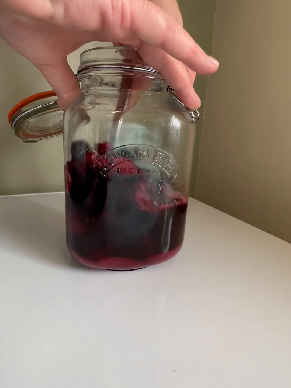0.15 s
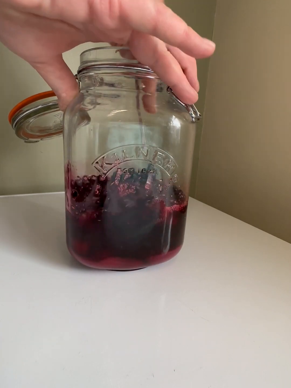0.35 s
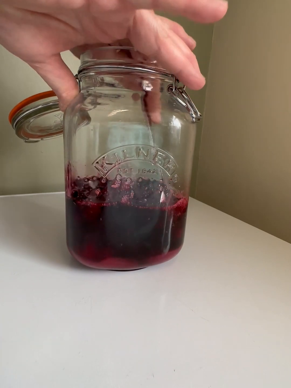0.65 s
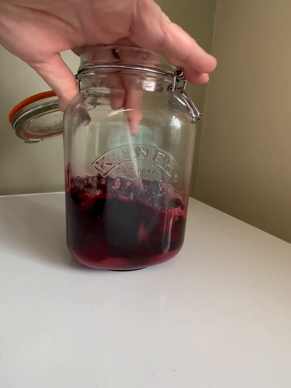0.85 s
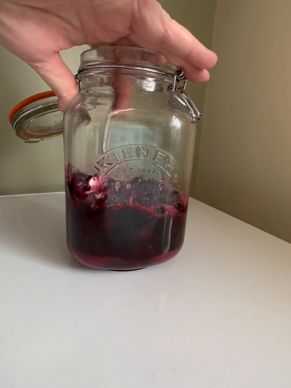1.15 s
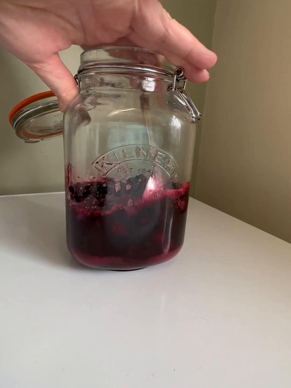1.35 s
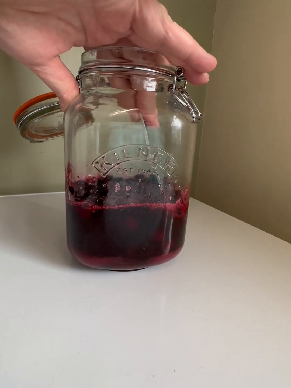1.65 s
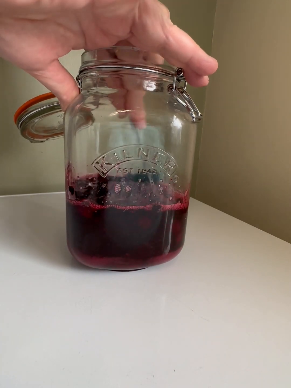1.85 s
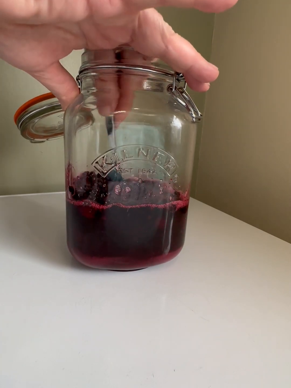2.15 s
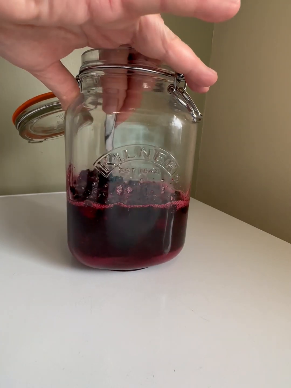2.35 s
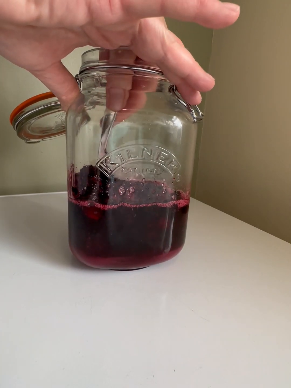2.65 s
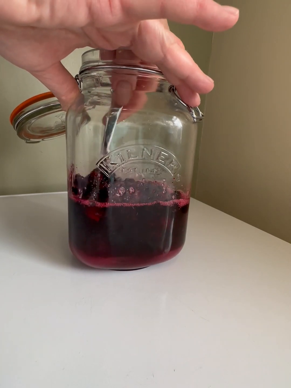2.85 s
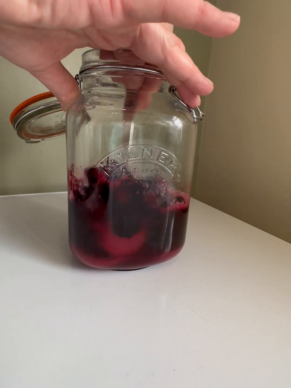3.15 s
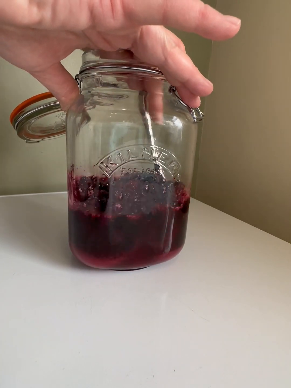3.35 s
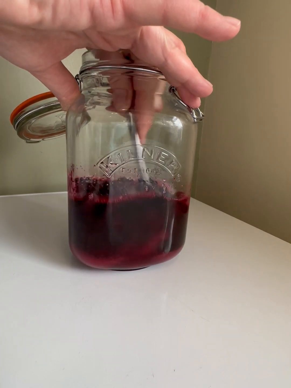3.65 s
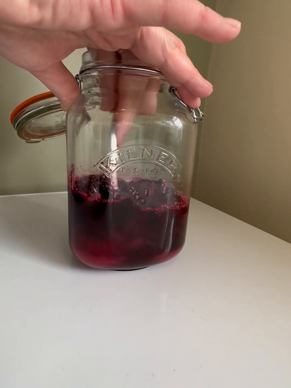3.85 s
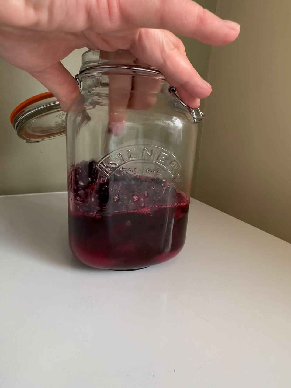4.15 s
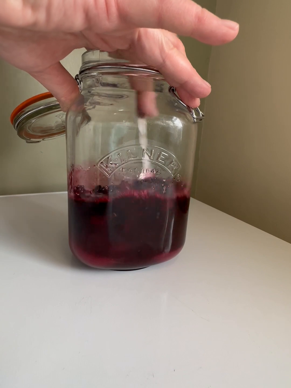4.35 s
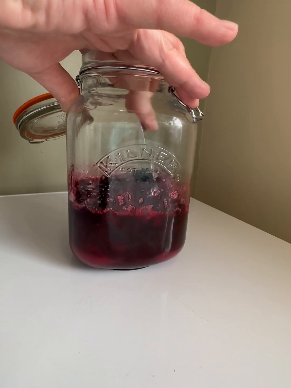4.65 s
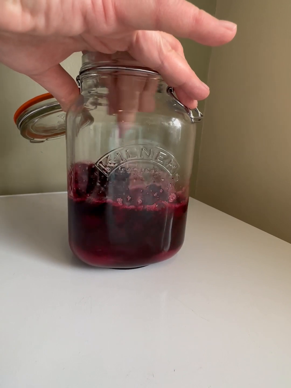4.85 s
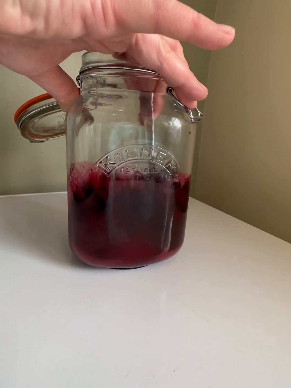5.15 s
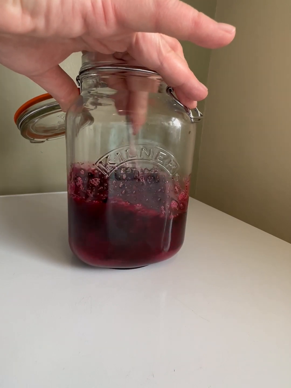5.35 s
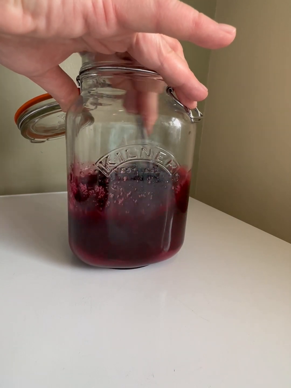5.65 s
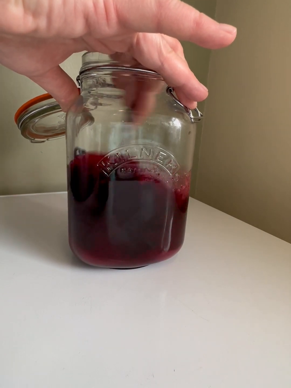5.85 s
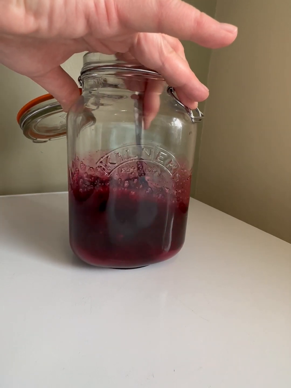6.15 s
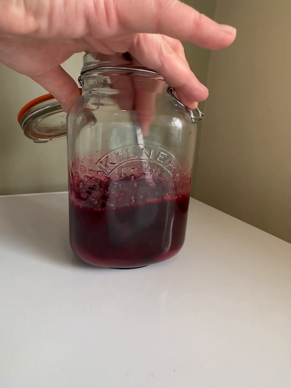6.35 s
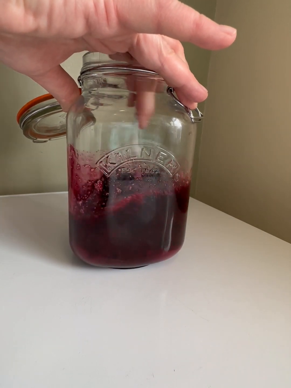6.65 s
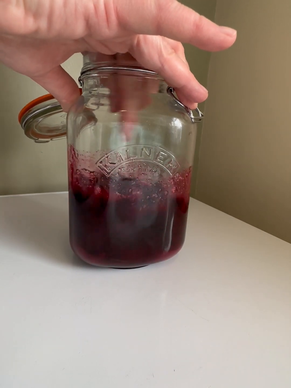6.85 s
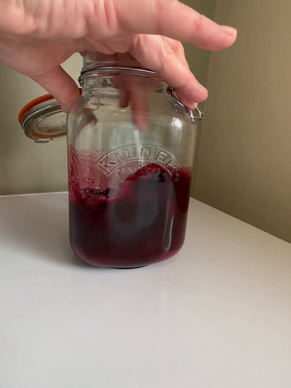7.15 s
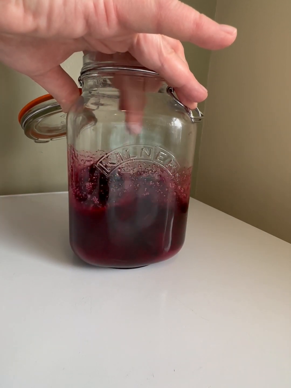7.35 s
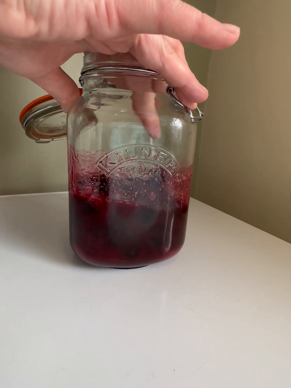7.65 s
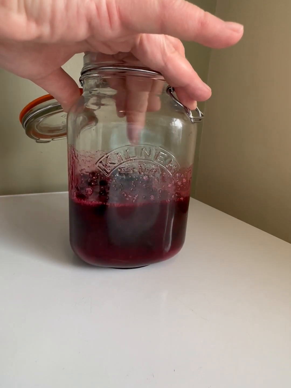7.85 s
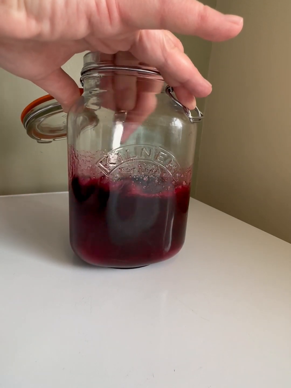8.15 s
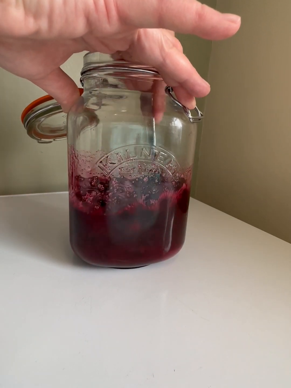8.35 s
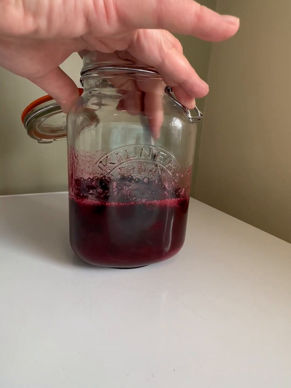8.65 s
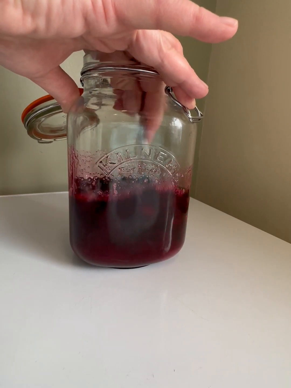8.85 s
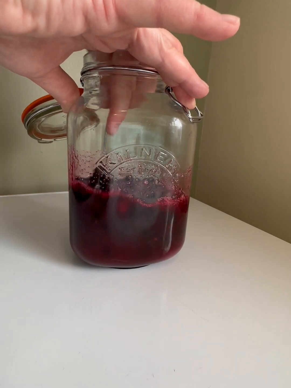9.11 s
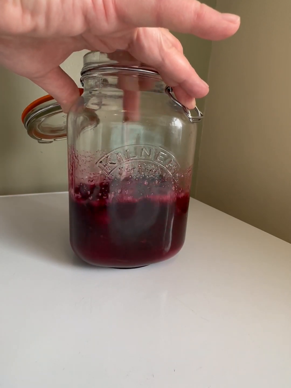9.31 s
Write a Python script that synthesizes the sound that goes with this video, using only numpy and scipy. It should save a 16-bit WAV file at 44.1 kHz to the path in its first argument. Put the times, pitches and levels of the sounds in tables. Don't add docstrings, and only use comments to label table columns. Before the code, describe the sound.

Close-up stirring of juicy fruit and sugar in a glass jar: short choked knocks, light ticks, soft grinding and booming bumps, growing busier.

```python
import sys
import numpy as np
from scipy import signal
from scipy.fft import rfft, irfft, next_fast_len
from scipy.io import wavfile
from scipy.ndimage import uniform_filter1d, map_coordinates

SR = 44100
rng = np.random.default_rng(int(sys.argv[2]) if len(sys.argv) > 2 else 0)


def to_linear_factor(level_db):
    exponent = np.asarray(level_db, float) / 20
    return 10 ** exponent


def pcm_store(signal):
    levels = np.round(np.clip(np.atleast_2d(signal), -1, 1) * 32767)
    wavfile.write(sys.argv[1], SR, levels.astype(np.int16).T)


N = 418068

# start in seconds, peak level in dB,
# strongest wall mode in Hz, middle modes in dB, high modes in dB.
KNOCKS = [(0.782, -20, 1420, -14, -22.5), (0.833, -19, 1174, -7.5, -24.5), (1.949, -17, 1705, -5.5, -22),
          (3.684, -27.5, 1110, -9, -24), (3.718, -21.5, 1116, -13, -25.5), (4.746, -28, 1106, -17, -9.5),
          (4.934, -21.5, 1570, -10, -4), (4.99, -14, 1203, 2.5, -7.5), (5.361, -23.5, 1650, -22, -26.5),
          (5.436, -19.5, 1175, -19.5, -14), (5.932, -16, 1453, -8, -14), (6.258, -15, 2685, -14, -17),
          (6.363, -18, 1370, -4, -16), (6.421, -12.5, 1224, -23, -28.5), (6.813, -17, 2750, -22.5, -24.5),
          (7.364, -5, 1156, -22.5, -21.5), (7.627, -17.5, 1785, -0.5, -3.5),
          (7.845, -8, 1020, -17.5, -30.5), (7.901, -14.5, 1680, -16, -19.5), (8.059, -16.5, 970, -5, 2),
          (8.87, -15, 1410, -11, -11), (8.922, -18.5, 1225, -28, -25), (8.942, -21, 1180, -15.5, -41),
          (9.085, -29, 950, -23, -25.5)]
# start in seconds, peak level in dB,
# strongest wall mode in Hz, brightness in dB.
TAPS = [(0.034, -53, 3160, -16), (0.822, -37, 1490, -7.5), (0.885, -33, 1170, -24),
        (1.269, -45.5, 1740, -2), (1.998, -33.5, 1580, -19), (2.662, -39, 1100, 6),
        (2.761, -30, 1600, -4.5), (2.818, -32, 1050, -9), (2.981, -34.5, 1450, -6), (3.016, -35, 1930, -13),
        (3.237, -37.5, 1080, -13.5), (3.493, -30, 1420, -13), (3.834, -36, 1170, -39),
        (4.881, -31.5, 1510, -5), (4.982, -25, 1600, -5.5), (5.424, -48, 4000, -5),
        (5.654, -35.5, 1540, -11.5), (5.709, -25.5, 1600, -8), (5.831, -29, 1230, -31),
        (5.874, -33, 1940, -23), (6.776, -35.5, 1600, -11.5), (6.901, -38.5, 900, -13),
        (7.021, -38.5, 1800, -28), (7.4235, -27, 1500, -28.5), (7.644, -23, 1680, -7.5),
        (7.724, -38, 940, -18), (8.151, -26.5, 1240, -14), (8.519, -25.5, 1250, -25),
        (9.067, -29.5, 1620, -13), (9.14, -31.5, 3860, -12.5)]
# start in seconds, peak level in dB,
# strongest wall mode in Hz, brightness in dB.
TICKS = [(0.903, -38, 3200, -23), (1.072, -32, 1600, -10.5), (1.585, -33.5, 3120, -2),
         (1.643, -35.5, 2970, -24), (1.691, -28, 3290, -19), (2.498, -40.5, 2970, -10),
         (2.516, -38, 2360, -5.5), (2.53, -24, 2680, 20), (2.696, -40.5, 3230, -6), (4.134, -40, 1800, -23),
         (4.356, -32, 3270, -2), (4.628, -42.5, 1980, -16.5), (5.104, -33.5, 3290, -14),
         (5.144, -34, 3230, -10), (5.913, -34.5, 3330, -16.5), (6.463, -28, 3650, -14),
         (6.499, -26, 2750, -13.5), (6.523, -37, 1390, -22.5), (6.944, -38, 3530, -19.5),
         (7.521, -32.5, 2430, -2), (8.018, -38.5, 4500, -19), (8.031, -28, 3000, -19),
         (8.089, -45, 3070, -8), (8.393, -25.5, 2470, -6), (8.468, -25.5, 3080, -13),
         (8.647, -29.5, 2290, -22), (8.673, -36.5, 1800, -4), (8.889, -31, 3000, -17),
         (9.022, -27, 2060, -19.5), (9.398, -46, 2410, -29)]
# start in seconds, peak level in dB,
# strongest wall mode in Hz.
SNAPS = [(4.664, -44.5, 1500), (0.245, -52.5, 4800), (0.734, -53, 990), (0.998, -55, 4400),
         (1.251, -48, 1470), (1.634, -33, 3100), (2.242, -35.5, 1680), (2.475, -49, 2890),
         (2.671, -60, 3030), (2.828, -43, 3080), (4.817, -36, 1560), (4.834, -37, 1530),
         (5.166, -33.5, 3100), (5.529, -39.5, 2670), (5.694, -34, 1080), (7.254, -43.5, 3630),
         (7.433, -31, 4090), (7.472, -41.5, 1700), (7.961, -37, 2400), (8.132, -33.5, 2920),
         (8.959, -44, 1930), (8.983, -46, 3640), (2.568, -40, 3040), (4.853, -36, 1500),
         (6.645, -45.5, 3020), (6.664, -41, 3550), (6.703, -47.5, 2630), (6.75, -50, 1800),
         (6.996, -43, 2190), (7.088, -53.5, 2310), (7.994, -34.5, 1500), (8.068, -29.5, 1250),
         (8.805, -48, 2510), (8.856, -39, 1270), (8.999, -37, 3830), (5.003, -28, 1090), (8.461, -37, 1650),
         (8.481, -28, 1690), (8.501, -37.5, 1700), (8.53, -36.5, 1710), (8.566, -45, 1650),
         (8.919, -34.5, 2840), (8.938, -31, 1430), (8.961, -37.5, 2500), (5.38, -43, 1600),
         (5.479, -41, 3070), (5.497, -42, 2100), (5.557, -38.5, 3100), (5.725, -31, 1550),
         (5.886, -44, 1790), (3.358, -51, 2970), (3.404, -68, 2270), (3.665, -43.5, 2580),
         (7.442, -36, 2630), (7.833, -31, 2760), (7.894, -39, 5600), (6.478, -31, 3350), (0.76, -62, 2400)]
# start in seconds, peak level in
# dB, mode in Hz.
SECOND_MODES = [(0.782, -19, 880), (0.782, -24.5, 2500), (0.832, -21, 1500), (1.071, -32.5, 2500),
                (1.95, -19, 2990), (1.95, -21, 950), (4.748, -33, 2200), (4.937, -34, 5900),
                (4.992, -32, 3100), (4.991, -18.5, 1600), (5.438, -23, 1720), (6.259, -20, 1200),
                (6.42, -30, 1610), (7.3647, -9.5, 1562), (7.364, -25.5, 6080), (7.631, -39, 4080),
                (7.845, -16, 1750), (7.901, -21, 2360), (7.902, -12, 1110), (8.017, -31.5, 4130),
                (8.058, -25.5, 5780), (8.154, -25.5, 2100), (8.87, -14.5, 2680), (8.393, -26.5, 3210)]
# centre in Hz, width in Hz, level in dB.
GLASS_MODES = [(940, 125, 4), (1600, 270, 7), (2600, 58, 0.5), (3100, 420, 2), (3890, 180, -1),
               (6310, 260, 0), (8750, 980, 5), (9550, 670, -4)]
# mode in Hz, level in dB, t60 in seconds.
SPOON_MODES = [(6240, -40, 0.15), (8600, -34, 0.1), (9890, -38, 0.2), (11300, -47, 0.14),
               (12300, -47, 0.25)]
# start in seconds, length in seconds, grinding level in dB.
STROKES = [(0.0, 0.09, -51), (1.527, 0.34, -51.5), (1.887, 0.2, -42), (2.05, 0.4, -48),
           (2.534, 0.02, -39.5), (2.702, 0.28, -42.5), (3.23, 0.06, -57.5), (3.538, 0.11, -59),
           (3.652, 0.031, -35.5), (3.84, 0.024, -40), (4.073, 0.094, -48.5), (4.564, 0.079, -46.5),
           (4.793, 0.11, -39.5), (4.932, 0.083, -41.5), (5.15, 0.023, -40), (5.396, 0.18, -45),
           (5.707, 0.018, -44.5), (5.89, 0.072, -40), (6.417, 0.09, -45.5), (6.672, 0.36, -47.5),
           (7.349, 0.2, -50), (7.66, 0.11, -39.5), (7.859, 0.065, -34.5), (7.983, 0.17, -38.5),
           (8.515, 0.035, -38.5), (8.662, 0.024, -51), (8.871, 0.014, -39), (8.959, 0.053, -38.5),
           (9.062, 0.087, -49), (9.378, 0.01, -68)]
# frequency in Hz, level in dB per Hz.
SUGAR_COLOUR = [(240, -9), (400, 2.5), (1120, -10.5), (1930, -7), (2550, -4), (3650, -10), (5140, -9.5),
                (12500, -16.5), (16500, -15.5)]
# start in seconds, length in seconds, centre in Hz, width in Hz, level in dB.
SLIDES = [(0.0, 0.48, 690, 120, -58), (0.062, 0.41, 3920, 150, -71), (1.166, 0.44, 2440, 62, -68),
          (1.376, 0.36, 8000, 280, -65), (1.988, 0.027, 1640, 80, -46), (2.119, 0.13, 2470, 59, -62),
          (2.129, 0.022, 820, 90, -49), (2.228, 0.029, 4440, 400, -59.5), (2.41, 0.066, 136, 14, -38.5),
          (2.59, 0.047, 630, 34, -53.5), (2.83, 0.1, 3440, 290, -54.5), (2.89, 0.015, 2550, 130, -52),
          (2.979, 0.032, 1410, 150, -59.5), (3.024, 0.049, 1810, 67, -58), (3.593, 0.096, 2690, 150, -58),
          (3.732, 0.044, 1480, 81, -57.5), (3.847, 0.015, 1190, 92, -48.5), (4.82, 0.11, 1500, 150, -49),
          (4.935, 0.013, 4050, 112, -47), (1.072, 0.0018, 4460, 270, -42.5), (6.284, 0.05, 1750, 200, -52),
          (6.365, 0.003, 750, 150, -47), (6.419, 0.0036, 780, 220, -23), (6.434, 0.0079, 1250, 71, -48),
          (6.465, 0.05, 3950, 1100, -39), (6.467, 0.015, 1830, 210, -42), (7.641, 0.027, 1600, 130, -45.5),
          (7.748, 0.034, 1490, 220, -53), (8.088, 0.015, 3000, 110, -44), (8.127, 0.015, 1130, 150, -46),
          (8.167, 0.037, 1390, 430, -46.5), (8.173, 0.0035, 530, 51, -35.5),
          (8.517, 0.017, 1400, 250, -61.5), (8.876, 0.0033, 2760, 59, -30.5),
          (9.034, 0.011, 2080, 150, -50)]
# start in seconds, peak level in dB.
SHOVES = [(0.605, -29.5), (0.713, -23), (0.961, -27), (1.697, -22), (1.912, -29), (1.992, -30),
          (2.53, -32.5), (3.506, -31.5), (3.698, -34), (4.15, -43.5), (4.476, -30), (4.612, -21),
          (4.759, -30), (5.444, -25.5), (5.665, -29.5), (5.733, -26.5), (5.92, -29.5), (6.123, -23.5),
          (6.269, -26.5), (6.416, -20.5), (6.654, -32.5), (6.809, -24.5), (7.035, -33.5), (7.37, -33),
          (7.636, -32.5), (7.911, -12.5), (8.178, -27.5), (8.519, -28), (8.883, -22), (9.021, -35)]
# start in seconds, peak level in dB, sharpness in dB.
THUDS = [(9.027, -33, -7), (0.743, -30.5, -19), (1.51, -33.5, -22), (1.688, -28, -5.5), (2.026, -35.5, -19),
         (2.426, -36.5, -37), (2.8, -37, -16), (3.5, -21, -11.5), (3.69, -27, -15.5), (3.811, -31.5, -18),
         (4.474, -36, -20), (4.593, -30, -21), (4.639, -20, -16), (4.748, -29, -21), (5.105, -36.5, -12),
         (5.439, -28, -2.5), (5.687, -32.5, -12), (5.935, -30.5, -2), (6.115, -25.5, -16.5),
         (6.26, -24, -4), (6.425, -18, -11), (6.793, -26.5, -7.5), (7.369, -30.5, -2.5),
         (7.632, -33.5, -14), (7.851, -25, -10), (7.928, -17, -15.5), (8.171, -33, 0), (8.516, -23.5, -13),
         (8.655, -30.5, -2.5), (8.881, -18.5, -40), (0.701, -33, -23), (0.835, -42.5, -1),
         (1.588, -46.5, 0), (1.647, -33, -3.5), (1.939, -40, -5), (2.002, -37.5, -9.5), (2.55, -42.5, -3.5),
         (2.992, -40.5, -6), (3.239, -43.5, 2.5), (3.717, -33.5, -8.5), (4.886, -26, -16.5),
         (5.663, -29, -7.5), (5.732, -33.5, -10), (6.366, -30, -8.5), (6.901, -44, 1), (7.024, -47.5, 2.5),
         (7.901, -21, -13), (8.064, -45, -4), (8.151, -37.5, -1), (8.397, -49.5, 8), (8.873, -33, -6),
         (9.085, -45.5, 7)]
# mode in Hz, level in dB, t60 in seconds.
WORKTOP_MODES = [(72.6, -6.5, 0.19), (137.1, -2, 0.12), (162.9, -10, 0.16), (257.6, 2.5, 0.11),
                 (311.8, 0, 0.21), (395.4, -8, 0.18), (541, 3, 0.065), (828, -11.5, 0.049)]
# frequency in Hz, lead of the left in radians.
LEFT_LEAD = [(30, -1.2), (70, -.45), (130, -.1), (300, -.7), (460, -1), (730, -1.9), (830, -1.9),
             (940, -.9), (1075, 1.2), (1600, .8), (3600, 1.2), (5500, -.8), (7700, -2.2), (11000, -2.4),
             (16000, -2.1)]
# frequency in Hz, left minus right in dB.
LEFT_TILT = [(60, -2), (240, 2.5), (950, -2), (3770, -0.5), (15000, -1)]
# frequency in Hz, t60 in seconds.
KITCHEN_T60 = [(200, 0.096), (2000, 0.2), (10000, 0.23)]
# frequency in Hz, room against direct sound in dB.
WETNESS = [(60, -6), (170, -23.5), (500, 3.5), (1100, -1.5), (1700, -4.5), (5500, 0.5), (12000, -11)]
# frequency in Hz, level in dB per Hz.
HUM_COLOUR = [(15, -27), (25, -1.5), (45, 8), (87, 6), (153, -5), (202, -8.5), (540, -7.5), (760, -17.5),
              (1070, -19), (2480, -22.5), (4600, -26.5), (5400, -32.5), (8180, -41), (9500, -50),
              (12000, -66), (15300, -58)]
# frequency in Hz, left-right likeness from -1 to 1.
HUM_ALIKE = [(25, 0.93), (60, 0.8), (180, 0.99), (550, 0.29), (1650, -0.28), (4970, -0.43), (15000, 0.36)]

KNOCK_T60, TAP_T60, TICK_T60, SNAP_T60 = 0.028, 0.021, 0.036, 0.014
T60_GROWS = 0.74
MIDDLE_DB, MIDDLE_SHARE = -4.5, 0.51
SNAP_BRIGHT_DB = -13
MAIN_DB, MAIN_GROWS = 9.5, 0.089
MAIN_T60, MAIN_RISE_TURNS = 0.018, 4.8
SECOND_T60, CRACK_DB, CRACK_T60 = 0.018, 2, 0.0071
BENDING_S = 0.003
GLOW_TILT_DB = -1.5
SPOON_S = 2.533
RISE_DB_PER_S, FALL_DB_PER_S, RESTING_DB = 203, 230, -63
SLIDE_FADE_S, SLIDE_WAVER_DB = 0.025, 3
UPPER_DB, UPPER_SHARE = -3.5, 0.59
AFTER_DB, AFTER_T60 = -18, 0.47
SHUDDER_DB, SHUDDER_SHARE = -47.5, 0.45
HUM_DB = -51


def unit(x):
    return x / np.sqrt(np.mean(x ** 2) + 1e-20)


def along(points, hz):
    f, v = np.transpose(points)
    return np.interp(np.log(hz + 1), np.log(f + 1), v)


def wobble(rate):
    knots = rng.standard_normal(int(N * rate / SR) + 4)
    return map_coordinates(knots, [np.arange(N) * rate / SR])


def filtered(x, response):
    m = next_fast_len(N + SR // 2)
    return irfft(rfft(x, m) * response(np.fft.rfftfreq(m, 1 / SR)), m)[..., :N]


def ringing(t, modes):
    hz, db, t60, rise, phase = np.asarray(modes).T[:, :, None]
    envelope = to_linear_factor(db - 60 * t / t60) * (1 - np.exp(-t / rise)) ** 2
    return (envelope * np.sin(2 * np.pi * hz * t + phase)).sum(axis=0)


def knocks():
    size, lead = SR // 6, SR // 100
    t, hz = np.arange(size) / SR, np.fft.rfftfreq(size, 1 / SR)
    swell = 1 - np.exp(-t / 0.003)
    blows, glows = np.zeros(N + SR), np.zeros((2, N + SR))
    hits = contacts()
    luck = rng.standard_normal((len(hits), 4, size))
    for (s, db, main_hz, middle_db, high_db, t60), noise in zip(hits, luck):
        colour = contact_colour(hz, noise[3, :len(hz)], main_hz, middle_db, high_db)
        crunch, *glow = unit(irfft(rfft(noise[:3]) * colour, size))
        decay = to_linear_factor(-60 * t / np.clip(t60, 0.006, 0.12)) + to_linear_factor(CRACK_DB - 60 * t / CRACK_T60)
        blow = to_linear_factor(-6.5 - 0.097 * db) * decay * (1 - np.exp(-t / 0.00035)) * crunch
        main_db = MAIN_DB + MAIN_GROWS * db
        blow += ringing(t, [(main_hz, main_db, MAIN_T60, MAIN_RISE_TURNS / main_hz, 3 * noise[0, 0])])
        start = round(s * SR) - 30
        blows[start:][:size] += to_linear_factor(db) * blow
        blows[start - lead:start] += to_linear_factor(db - 22 - 60 * t[lead:0:-1] / 0.02) * crunch[-lead:]
        glows[:, start:start + size] += to_linear_factor(0.73 * db - 11 - 60 * t / 0.054) * swell * glow
    for (s, db, mode_hz), phase in zip(SECOND_MODES, rng.standard_normal(len(SECOND_MODES))):
        second = ringing(t, [(mode_hz, db + 7, SECOND_T60, 3 / mode_hz, 3 * phase)])
        blows[round(s * SR) - 30:][:size] += second
    dulling = lambda f: to_linear_factor(GLOW_TILT_DB * np.log2(np.maximum(f, 2000) / 2000))
    return filtered(blows[:N], bending), filtered(glows[:, :N], dulling)


def contacts():
    def light(rows, t60):
        return [(s, db, hz, MIDDLE_DB + MIDDLE_SHARE * bright_db, bright_db, t60)
                for s, db, hz, bright_db in rows]

    rows = [(*row, KNOCK_T60) for row in KNOCKS]
    rows += light(TAPS, TAP_T60) + light(TICKS, TICK_T60)
    rows += light([(*row, SNAP_BRIGHT_DB) for row in SNAPS], SNAP_T60)
    return [(*row, t60 * (row[2] / 1500) ** T60_GROWS) for *row, t60 in rows]


def contact_colour(hz, noise, main_hz, middle_db, high_db):
    shape = [(350, -12), (700, 1.5), (1500, -12), (3200, middle_db), (7000, high_db - 1),
             (12500, high_db - 23), (16000, high_db - 6)]
    spot = to_linear_factor(6.2 * np.tanh(unit(uniform_filter1d(noise, size=50))) * hz / (hz + 1200))
    peak = 1 + 1.2 / (1 + ((hz - main_hz) / 300) ** 2)
    low_cut = 1 + (0.85 * min(main_hz, 1300) / (hz + 1)) ** 6
    return spot * peak / low_cut * wall(hz) * to_linear_factor(along(shape, hz))


def wall(hz):
    return 1 + sum(to_linear_factor(db) / (1 + ((hz - c) / w) ** 2) for c, w, db in GLASS_MODES)


def bending(hz):
    return np.exp(-2j * np.pi * BENDING_S * (2 * np.sqrt(1000 * hz) - hz / 2.5))


def spoon():
    out, t = np.zeros(N), np.arange(SR // 3) / SR
    out[round(SPOON_S * SR):][:len(t)] = ringing(t, [(*mode, 0.001, 0) for mode in SPOON_MODES])
    return out


def stirring():
    t = np.arange(N) / SR
    level_db = np.full(N, float(RESTING_DB))
    for s, length, db in STROKES:
        rise_db = RISE_DB_PER_S * np.clip(s - t, 0, None)
        fall_db = FALL_DB_PER_S * np.clip(t - s - length, 0, None)
        level_db = np.maximum(level_db, db - rise_db - fall_db)
    return level_db


def sugar(grind_db):
    clumps = to_linear_factor(3 * wobble(30) + 3.2 * wobble(90))
    struck = rng.random(N) < 1100 / SR
    cracks = struck * rng.standard_normal(N) * to_linear_factor(17 * rng.random(N) ** 2)
    z = signal.stft(unit(cracks) + 1.6 * rng.standard_normal(N), nperseg=1024)[2]
    patches = uniform_filter1d(rng.standard_normal(z.shape), size=3, axis=0)
    patches = uniform_filter1d(patches, size=14, axis=1)
    grit = signal.istft(z * to_linear_factor(4.2 * unit(patches)), nperseg=1024)[1][:N]
    coloured = filtered(grit, lambda hz: to_linear_factor(along(SUGAR_COLOUR, hz)) * np.sqrt(wall(hz)))
    wet = to_linear_factor(-9.5) * unit(np.resize(squelches(), N))
    return to_linear_factor(grind_db - 6) * (unit(clumps * coloured) + wet)


def squelches(count=2200):
    when, pitch, size = rng.random((count, 3)).T[:, :, None]
    k = np.arange(700)
    turns = k / SR * 900 * 5.5 ** pitch
    rings = to_linear_factor(11 * size ** 2) * np.sin(2 * np.pi * turns) * turns * np.exp(-turns / 3)
    return np.bincount(((when * N).astype(int) + k).ravel(), rings.ravel())[:N]


def slides():
    size, lead = SR * 4 // 7, SR // 25
    out, waver = np.zeros(N + SR), to_linear_factor(SLIDE_WAVER_DB * wobble(25))
    t, hz = (np.arange(size) - lead) / SR, np.fft.rfftfreq(size, 1 / SR)
    luck = rng.standard_normal((len(SLIDES), size))
    for (s, length, mode_hz, width_hz, db), noise in zip(SLIDES, luck):
        hiss = unit(irfft(rfft(noise) / (1 + ((hz - mode_hz) / width_hz) ** 2), size))
        fade = np.clip(np.minimum(4 * t, length - t) / SLIDE_FADE_S + 1, 0, 1)
        out[round(s * SR):][:size] += to_linear_factor(db) * hiss * fade
    return out[lead:][:N] * waver


def worktop(effort_db):
    out, slop, t = np.zeros(N + SR), np.zeros(N + SR), np.arange(SR // 3) / SR
    hz, mode_db, t60 = np.transpose(WORKTOP_MODES)
    for (s, db), (shift, phase) in zip(SHOVES, rng.standard_normal((len(SHOVES), 2))):
        boom = ringing(t, [(hz[0] * (1 + 0.035 * shift), db + 11.5, t60[0], 0.014, 2 * phase)])
        out[round(s * SR):][:len(t)] += boom
    luck = rng.standard_normal((len(THUDS), 3, len(hz)))
    for (s, db, sharp_db), (shift, strength, phase) in zip(THUDS, luck):
        upper_db = np.where(hz < 350, UPPER_DB + UPPER_SHARE * sharp_db, sharp_db)
        level = db + 5.5 + mode_db + 2 * strength + np.where(hz < 200, 0, upper_db)
        shifted_hz = hz * (1 + 0.0935 * np.tanh(shift) * hz / 300)
        modes = np.transpose([shifted_hz, level, t60, 0.34 / hz, 2 * phase])
        out[round(s * SR):][:len(t)] += ringing(t, modes[1:])
        slop[round(s * SR):][:len(t)] += to_linear_factor(db + AFTER_DB - 60 * t / AFTER_T60) * (1 - np.exp(-t / 0.0057))
    shudder = unit(filtered(rng.standard_normal(N) * to_linear_factor(4.16 * wobble(20)), panel))
    effort = uniform_filter1d(effort_db - effort_db.mean(), size=6000)
    steady = to_linear_factor(SHUDDER_DB + SHUDDER_SHARE * effort)
    return out[:N] + (steady + slop[:N]) * shudder


def panel(f):
    total = 0
    lowest_weight_hz = 80
    for k, (hz, _, t60) in enumerate(WORKTOP_MODES):
        damping = 1j * f * np.log(1000) / np.pi / t60
        weight = (-1) ** k * (lowest_weight_hz / hz) ** 0.97
        total = total + weight * damping / (hz ** 2 - f * f + damping)
    return total


def ports(x):
    side = np.array([[0.5], [-0.5]])
    return filtered(x, lambda hz: to_linear_factor(side * along(LEFT_TILT, hz)) * np.exp(1j * side * along(LEFT_LEAD, hz)))


def kitchen(x):
    hz, t, z = signal.stft(rng.standard_normal((2, SR // 2)), SR, nperseg=256)
    decay_db = along(WETNESS, hz)[:, None] - 60 * t / along(KITCHEN_T60, hz)[:, None]
    tail = signal.istft(z * to_linear_factor(decay_db), SR, nperseg=256)[1]
    delayed = np.pad(x, (120, 0))[None]
    return signal.fftconvolve(delayed, tail / np.linalg.norm(tail[0]), axes=1)[:, :N]


def hum():
    def mid_side(hz):
        turn = np.arccos(np.clip(along(HUM_ALIKE, hz), -1, 1)) / 2
        return to_linear_factor(along(HUM_COLOUR, hz)) * [np.cos(turn), np.sin(turn)]

    mid, side = filtered(rng.standard_normal((2, N)), mid_side)
    return to_linear_factor(HUM_DB + 2 + 0.27 * wobble(2.9)) * unit(np.array([mid + side, mid - side]))


def scene():
    blows, glows = knocks()
    effort_db = stirring()
    jar = blows + sugar(effort_db) + slides() + spoon()
    boom = worktop(effort_db)
    room = kitchen(to_linear_factor(-12.5) * jar + to_linear_factor(-9.5) * boom)
    return ports(jar + boom) + glows + room + hum()


def band_limit(x):
    return signal.sosfilt(signal.butter(12, 17150, fs=SR, output="sos"), x)


def record(dry):
    mix = filtered(dry, lambda hz: (hz < 15950) / (1 + (31 / (hz + 1)) ** 6))
    return band_limit(mix)


dry = scene()
out = record(dry)
pcm_store(out)
```